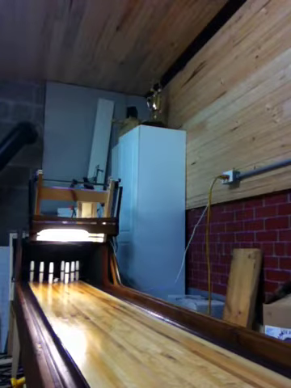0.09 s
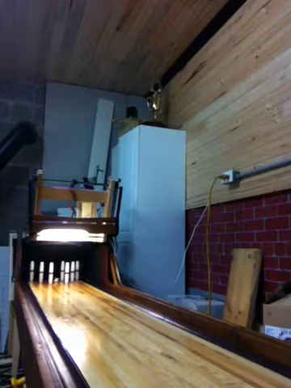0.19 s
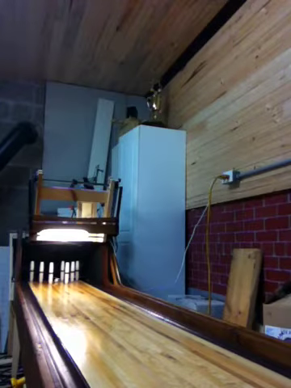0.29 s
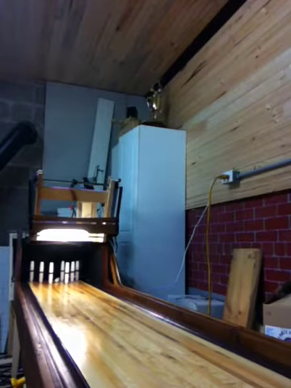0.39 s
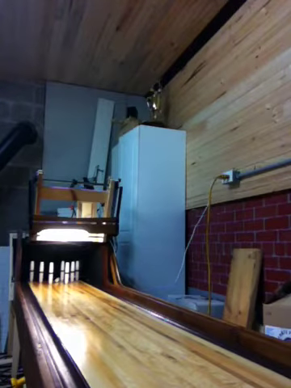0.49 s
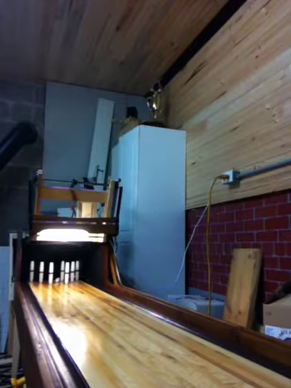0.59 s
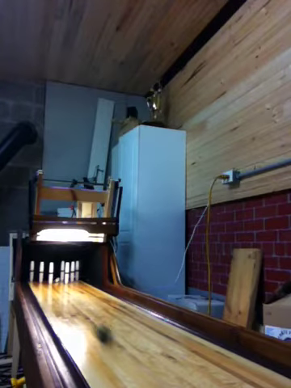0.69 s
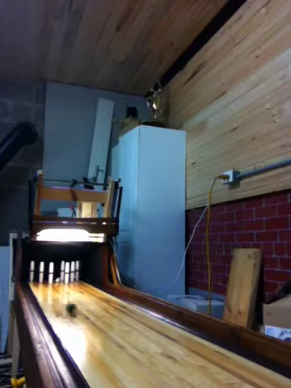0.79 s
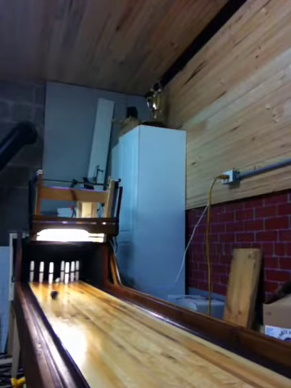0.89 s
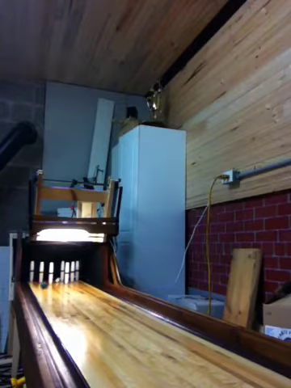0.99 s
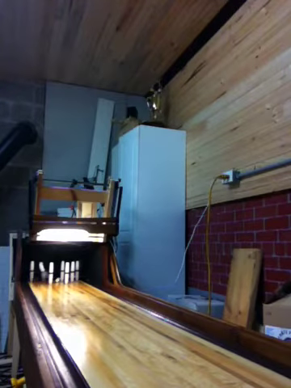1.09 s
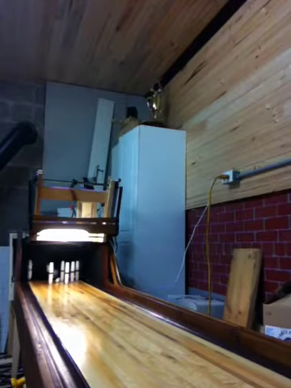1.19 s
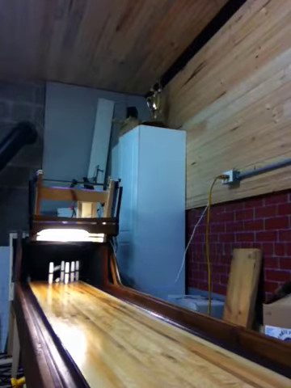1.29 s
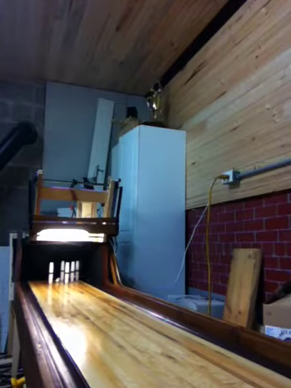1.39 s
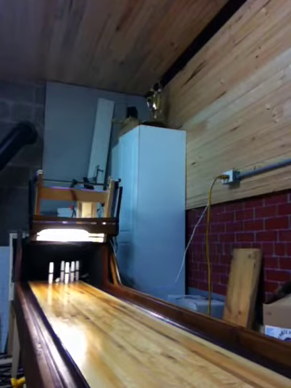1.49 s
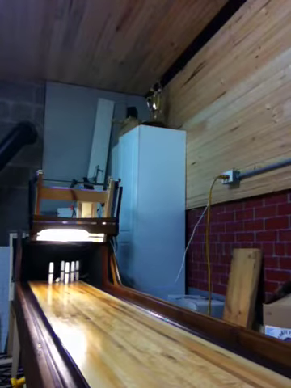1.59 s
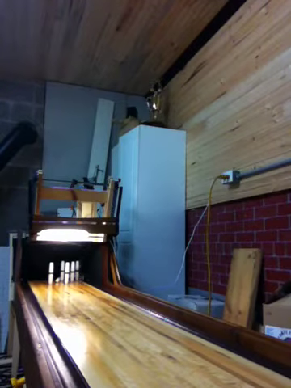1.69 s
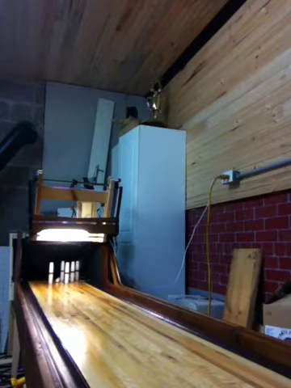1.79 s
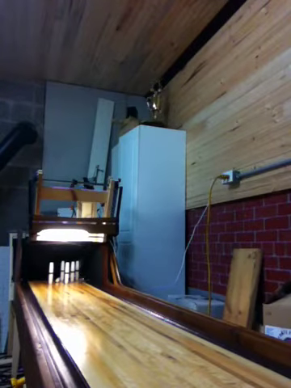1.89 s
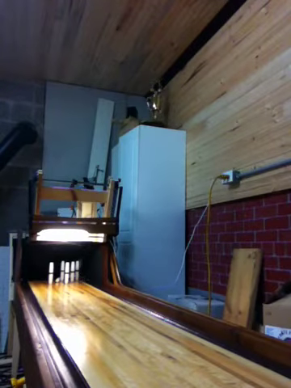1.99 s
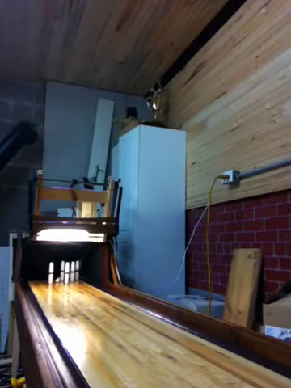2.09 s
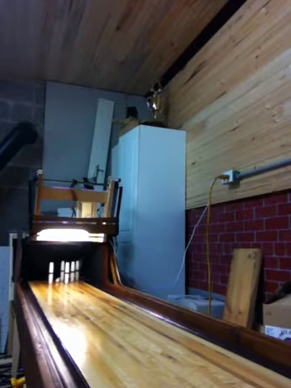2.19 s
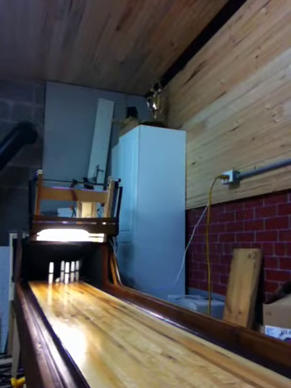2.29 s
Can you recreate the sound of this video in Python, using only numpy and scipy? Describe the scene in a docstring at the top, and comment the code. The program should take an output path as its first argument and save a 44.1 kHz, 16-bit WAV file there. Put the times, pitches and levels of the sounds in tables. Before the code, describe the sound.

A small bowling ball lands with a loud woody thump, bounces ever faster and rumbles down the lane, then cracks into pins that tumble with hollow clatter and pit thuds; mono, heard from the near end of an indoor lane.

```python
"""Bowling in a basement lane

From the near end of a wooden lane, a small ball drops, bounces ever faster and rolls away.
It cracks into the pins and thuds into the pit; pins tumble and the hollow pinsetter frame drones.
Contact clicks ring filters shaped like lane, pins, pit and metal; shaped noise makes drone and room tone.
A wood-panelled room answers every blow and the rolling, and a limiter holds down the loudest peaks."""
import sys
import numpy as np
from scipy import signal
from scipy.fft import rfft, irfft
from scipy.io import wavfile
from scipy.ndimage import uniform_filter1d, minimum_filter1d

SR = 44100
rng = np.random.default_rng(int(sys.argv[2]) if len(sys.argv) > 2 else 0)


def master(y):
    """Save y as 16-bit WAV."""
    cut = np.clip(np.atleast_2d(y).T, -1, 1)
    pcm = np.round(cut * 32767)  # scale
    wavfile.write(sys.argv[1], SR, pcm.astype(np.int16))


N = 103635  # length of the scene [samples]
TIME = np.arange(N) / SR  # [s]
TAPS = 32768  # length of the room response [samples]
T, HZ = np.arange(TAPS) / SR, np.fft.rfftfreq(TAPS, 1 / SR)  # its time [s] and frequency [Hz] axes


def bounces():
    """The ball hops and scuffs down the boards; its first landing sets the whole lane booming."""
    # ball landing on the lane: (time [s], level [dB], brightness [dB/octave], room [dB re direct])
    landings = [(0.2446, -1, 1, -5.5), (0.2517, -21.5, 4, 2), (0.2686, -21, 3, -1), (0.3444, -5, 0.5, -6.5),
                (0.4058, -11.5, .5, 0), (0.452, -16.5, -0.5, -4), (0.4891, -19, -5.5, -18),
                (0.5166, -16, -3, -5), (0.5404, -25, 2, -0.5), (.559, -25, -4, 0.5), (.631, -19, -1, -9),
                (0.6517, -20.5, -0.5, -2), (.709, -29, 1, 3), (0.748, -34.5, -1.5, 0), (.8465, -24, 0, 1),
                (1.094, -18.5, -1, -8), (1.117, -19.5, -1, -15)]
    # ball scuffing over rough patches: the same columns, then (rattle decay [s])
    scuffs = [(0.86, -21.5, 1, -6, 0.032), (1.062, -19, 0, -4, 0.019)]
    # broad colour of the lane boards: (frequency [Hz], level [dB per Hz])
    boards = [(30, -52), (65, -42), (95, -23.5), (160, -3.5), (330, -3), (600, -0.5), (1150, 3),
              (1900, -7.5), (2800, -14), (5000, -25), (8000, -35.5), (11500, -48.5), (15500, -75)]
    # modes of the boards: (frequency [Hz], width [Hz], level over the broad colour [dB])
    board_modes = [(99, 15, 13), (330, 48, -3), (504, 34, 3.5), (1056, 24, -4), (1084, 670, -3.5),
                   (1236, 25, -14), (1630, 140, 1), (1924, 210, -0.5)]
    rattle_s, click_share = 0.003, 0.55
    sag_hz, sag_db, sag_t60 = 103.5, -34.5, 1.0  # the lane bends; t60 in seconds

    out = np.zeros(N)
    for s, *hit in landings:
        add(out, s, blow(boards, board_modes, click_share, *hit, rattle_s))
    for s, *hit in scuffs:
        add(out, s, blow(boards, board_modes, 0, *hit))
    sag = amp(sag_db - 60 * TIME / sag_t60) * np.sin(2 * np.pi * sag_hz * TIME)
    add(out, landings[0][0], sag)
    return out


def rolling():
    """Tiny bumps of the rolling ball drum on the lane, in uneven clumps."""
    # loudness of the rolling: (time [s], level [dB])
    roll_level = [(.25, -59), (.45, -32), (.57, -32.5), (.62, -32.5), (.68, -34.5), (.8, -34), (.88, -32),
                  (.96, -30), (1.02, -31), (1.08, -28.5), (1.14, -28), (1.19, -41), (1.3, -71)]
    # colour of the rolling: (frequency [Hz], level [dB per Hz])
    roll_colour = [(30, -13), (75, -45), (110, -13.5), (165, -0.5), (280, -8), (560, -1), (900, 7.5),
                   (1400, 0), (2400, -13.5), (4500, -25.5), (8000, -38), (15000, -73)]
    flutter_db, flutter_s = 3.5, 0.018  # rms swing and averaging time
    bumps_per_s, spread_db, room_db = 1400, 2, -1.5

    wander = uniform_filter1d(rng.standard_normal(N), max(round(flutter_s * SR), 1))
    flutter = amp(flutter_db * evened(wander))
    bumps = flutter * clicks(bumps_per_s, spread_db, size=N)
    drumming = signal.fftconvolve(bumps, body(roll_colour))[:N]
    direct = level(roll_level) * evened(drumming)
    return direct + amp(room_db) * signal.fftconvolve(direct, room())[:N]


def pins():
    """Sharp cracks of ball on pin, then pins rattling against the deck and each other."""
    # ball against pins: (time [s], level [dB], brightness [dB/octave], room [dB re direct])
    cracks = [(1.1679, -20.5, -6.5, 3.5), (1.1714, -14, 0, -3), (1.2022, -26, -6, 1.5),
              (1.2045, -15, -3.5, -8)]
    # broad colour of a struck pin: (frequency [Hz], level [dB per Hz])
    pin_colour = [(100, -36), (400, -21.5), (1000, -10.5), (1700, 1.5), (2600, -3.5), (4400, 0),
                  (6000, -4.5), (6900, -7.5), (7700, -21), (10000, -29), (11600, -38), (15500, -59)]
    # modes of a struck pin: (frequency [Hz], width [Hz], level over the broad colour [dB])
    pin_modes = [(1630, 83, -4), (2100, 45, -4), (2600, 61, -5), (3560, 70, -10), (4260, 81, -4),
                 (4890, 90, -14), (6800, 300, -2), (9920, 100, 17), (12700, 250, 8)]
    crack_rattle_s, crack_click_share = 0.0031, 0.3
    # pins tumbling: (time [s], level [dB], brightness [dB/octave], room [dB re direct], rattle decay [s])
    tumbles = [(1.317, -16, -2, 4, 0.0079), (1.3852, -8.5, 0, -2.5, 0.0043), (1.410, -11, 4.5, 0, 0.0098),
               (1.4178, -9.5, 4, -8, 0.0039), (1.447, -20, -2, -0.5, 0.014), (1.495, -16, 0.5, 0.5, 0.011),
               (1.5289, -12.5, .5, 0, 0.015), (1.544, -13, -.5, -1.5, 0.016),
               (1.577, -13.5, -1.5, -0.5, 0.014), (1.746, -22.5, 5, -5, 0.018),
               (1.804, -28, 1, 3.5, 0.0058), (1.836, -21, 1, -0.5, 0.011), (1.9027, -25.5, 0, -0.5, .01),
               (1.938, -23.5, -0.5, -3, 0.01), (2.051, -26.5, -4, 1, .008), (2.09, -23, -4, -2, 0.011),
               (2.134, -31, -5, -2.5, .01)]
    # broad colour of the tumbling: (frequency [Hz], level [dB per Hz])
    clatter = [(30, -21), (80, -54), (135, 0), (200, -11.5), (400, 3), (900, -2), (1500, 4), (2600, 0),
               (4000, -3.5), (5500, -7), (8000, -17), (10500, -27.5), (13000, -46), (15500, -84)]
    # modes of the tumbling pins: (frequency [Hz], width [Hz], level over the broad colour [dB])
    clatter_modes = [(555, 9, 9), (961, 62, 10), (1323, 79, -2), (2070, 23, 3), (2308, 21, 1),
                     (2725, 86, -4), (3010, 67, -5), (3180, 42, 0), (3700, 60, -11), (4270, 50, -20),
                     (4900, 99, -4.5), (5240, 31, -5), (5860, 49, -1), (7360, 73, -3)]
    tumble_click_share = 0.093

    out = np.zeros(N)
    for s, *hit in cracks:
        add(out, s, blow(pin_colour, pin_modes, crack_click_share, *hit, crack_rattle_s))
    for s, *hit in tumbles:
        add(out, s, blow(clatter, clatter_modes, tumble_click_share, *hit))
    return out


def pit():
    """Dull knocks on the boards behind the pins; each has its own quickly damped pitch."""
    # ball on the pit boards:
    # (time [s], level [dB], brightness [dB/octave], room [dB re direct], knock pitch [Hz])
    thuds = [(1.251, -24.5, 0.5, 4, 890), (1.3228, -5.5, 4.5, -12.5, 746), (1.386, -19.5, 4.5, 7, 890),
             (1.3922, -25, -7.5, 11.5, 730), (1.413, -26.5, -6, 9, 593), (1.537, -16, -4.5, -4, 540),
             (1.548, -18.5, 1.5, 2, 560), (1.6292, -11, 0, -1.5, 1040), (1.6363, -15, 2.5, -2.5, 1190),
             (1.7532, -5, 1.5, -8, 890), (1.805, -22, -3.5, 8.5, 500), (1.95, -23.5, -4, 4.5, 700),
             (2.141, -28.5, -2, -10, 616), (2.201, -34.5, -4, -2, 790), (2.275, -42.5, -9, 8.5, 635)]
    # broad colour of the pit boards: (frequency [Hz], level [dB per Hz])
    pit_colour = [(30, -19), (80, -23), (140, -20), (260, -3.5), (520, -2.5), (900, -2), (1300, -2),
                  (2000, -2.5), (3500, -23.5), (8000, -33.5), (15000, -65)]
    # modes shared by all the thuds: (frequency [Hz], width [Hz], level over the broad colour [dB])
    pit_modes = [(547, 40, 8), (750, 46, 3)]
    rattle_s, click_share = 0.0035, 0.5
    knock_width_hz, knock_db = 190, 12

    out = np.zeros(N)
    for s, db, tilt, room_db, knock_hz in thuds:
        modes = pit_modes + [(knock_hz, knock_width_hz, knock_db)]
        add(out, s, blow(pit_colour, modes, click_share, db, tilt, room_db, rattle_s))
    return out


def pinsetter():
    """Shaking, as noise, makes the hollow frame drone in a few resonances; a loose part clinks."""
    # loudness of the drone: (time [s], level [dB])
    drone_level = [(1.3, -61), (1.42, -26.5), (1.72, -60), (1.76, -30), (1.81, -32), (1.85, -26.5),
                   (1.97, -34.5), (2.03, -41), (2.08, -30.5), (2.14, -40.5), (2.25, -45), (2.35, -45)]
    # frame resonances: (frequency [Hz], width at half amplitude [Hz], relative level [dB])
    frame = [(129, 17, -17), (349.6, 25, -3), (374, 41, -11.5), (510, 220, -13), (810, 370, -7.5)]
    # loose metal part: (time [s], level [dB], brightness [dB/octave], room [dB re direct])
    clinks = [(1.905, -35, 16, -15), (1.912, -20, -8.5, -6.5), (1.917, -32, 7, -14)]
    # broad colour of the metal: (frequency [Hz], level [dB per Hz])
    metal = [(200, -36), (1200, -3), (2000, 8), (4000, 0), (5000, -32), (15000, -59)]
    # modes of the metal: (frequency [Hz], width [Hz], level over the broad colour [dB])
    metal_modes = [(1650, 310, 11), (4000, 100, 16)]
    rattle_s, click_share = 0.005, 0.27

    hz = np.fft.rfftfreq(N, 1 / SR)
    drone = np.zeros(N)
    for centre, width, db in frame:
        random_phase = np.exp(2j * np.pi * rng.random(len(hz)))
        resonance = 1 / (1 + (2 * (hz - centre) / width) ** 2)
        drone += amp(db) * evened(irfft(random_phase * resonance, N))
    out = level(drone_level) * evened(drone)
    for s, *hit in clinks:
        add(out, s, blow(metal, metal_modes, click_share, *hit, rattle_s))
    return out


def room():
    """Random echoes, a little stronger early on, in a tail that dies band by band."""
    # reverberation of the room: (frequency [Hz], time to fall 60 dB [s])
    decay_t60 = [(80, 0.72), (300, 0.46), (1000, 0.39), (3000, 0.52), (7000, 0.5), (14000, 0.12)]
    delay_s, early_db, early_s = 0.005, -11, 0.035  # early extra relative to the tail

    hz, t, bands = signal.stft(clicks(5000, 2, size=TAPS), SR, nperseg=256)
    fading = amp(-60 * t / read(decay_t60, hz)[:, None])
    tail = signal.istft(bands * fading, SR, nperseg=256)[1][:TAPS]
    early = 1 + amp(early_db) * np.exp(-T / early_s)
    return unit(tail * (T > delay_s) * early)


def hush():
    """Quiet room tone: steady noise shaped in frequency."""
    # colour of the room tone: (frequency [Hz], level [dB per Hz])
    tone_colour = [(18, -16), (30, -34), (71, -7.5), (205, -5.5), (296, -7.5), (328, -11), (1090, -21.5),
                   (6360, -25.5), (9640, -26.5), (15000, -38.5)]
    tone_db = -58.5

    gain = amp(read(tone_colour, np.fft.rfftfreq(N, 1 / SR)))
    noise = irfft(rfft(rng.standard_normal(N)) * gain, N)
    return amp(tone_db) * evened(noise)


def blow(colour, modes, click_share, db, tilt, room_db, rattle_s):
    """One contact and its dying chatter ring an object, and the object rings the room."""
    blow_s = 0.004  # db is the direct level with its energy spread over this time
    chatter_size = 4096  # [samples]

    share = np.clip(click_share, 0, 1)  # part of the energy in the first contact
    chatter = clicks(1500, 3, size=chatter_size) * np.exp(-T[:chatter_size] / rattle_s)
    force = np.sqrt(1 - share) * unit(chatter)
    force[0] += np.sqrt(share)
    direct = unit(signal.fftconvolve(colourless(force, size=21), body(colour, modes, tilt)))
    sound = amp(room_db) * unit(signal.fftconvolve(direct, colourless(room(), size=61)))
    add(sound, 0, direct)
    return amp(db) * np.sqrt(blow_s * SR) * sound


def body(colour, modes=(), tilt=0):
    """Ring of an object: a broad colour with modes standing out of it."""
    octaves = np.log2(np.clip(HZ, 300, 12000) / 1000)  # brightness tilts about 1 kHz
    db = read(colour, HZ) + tilt * octaves
    ring = 1 + sum(amp(mode_db) / (1 + 2j * (HZ - hz) / width) for hz, width, mode_db in modes)
    return irfft(causal(amp(db)) * ring)[:TAPS // 4]


def clicks(per_s, spread_db, size):
    """Random contacts of uneven strength and either sign."""
    contacts = rng.random(size) < per_s / SR
    sign = rng.choice([-1., 1.], size)
    strength = amp(spread_db * np.minimum(rng.exponential(1, size), 4))
    return contacts * sign * strength


def causal(gain):
    """Spectrum of the most compact causal response with these gains (minimum phase)."""
    both_sides = np.r_[gain, gain[-2:0:-1]]
    log_spectrum = np.conj(signal.hilbert(np.log(both_sides + 1e-9)))
    return np.exp(log_spectrum)[:len(gain)]


def colourless(x, size):
    """Evens out the spectrum over size bins: scattering spreads a sound in time but keeps its colour."""
    spectrum = rfft(x)
    smooth_power = uniform_filter1d(abs(spectrum) ** 2, size)
    return irfft(spectrum / causal(np.sqrt(abs(smooth_power))))


def amp(db):
    """Decibels to gain."""
    return 10 ** (np.asarray(db) / 20)


def unit(x):
    """Scales to energy 1."""
    return x / np.sqrt(np.sum(x ** 2) + 1e-20)


def evened(x):
    """Scales to rms 1."""
    return unit(x) * np.sqrt(len(x))


def read(points, hz):
    """Reads a table on a log-frequency axis."""
    f, value = np.transpose(points)
    return np.interp(np.log(hz + 1), np.log(f + 1), value)


def level(points):
    """Gain over time from (time [s], level [dB]) points, 120 dB down before the first."""
    return amp(np.interp(TIME, *np.transpose(points), left=-120))


def add(mix, s, sound):
    """Mixes a sound in at time s, cut off at the end of the mix."""
    part = mix[round(s * SR):][:len(sound)]
    part += sound[:len(part)]


def scene():
    """Everything in one channel, as heard from the near end of the lane."""
    return (bounces() + rolling() + pins() + pit() + pinsetter() + hush())[None]


def record(dry):
    """A fast limiter holds the loudest peaks down; then the low cut and the band limit."""
    ceiling, limit_s = 0.72, 0.0002  # limiter peak and reaction time
    low_cut_hz, edge_hz = 79, 15800

    span = max(round(limit_s * SR), 1)
    needed = np.minimum(1, ceiling / (abs(dry) + 1e-9))
    gain = uniform_filter1d(minimum_filter1d(needed, 2 * span + 1), span)
    low_cut = signal.butter(2, low_cut_hz, "high", fs=SR, output="sos")
    held = signal.sosfilt(low_cut, dry * gain)
    band_limit = signal.firwin(511, edge_hz, window=("kaiser", 9), fs=SR)
    return signal.oaconvolve(held, band_limit[None], "same")


dry = scene()
out = record(dry)
master(out)
```